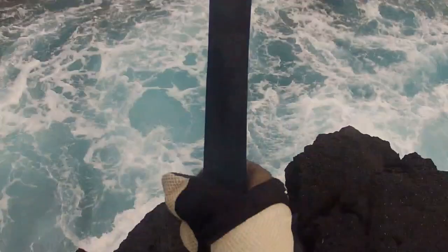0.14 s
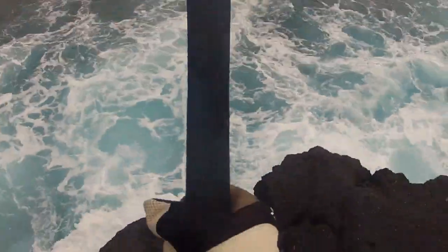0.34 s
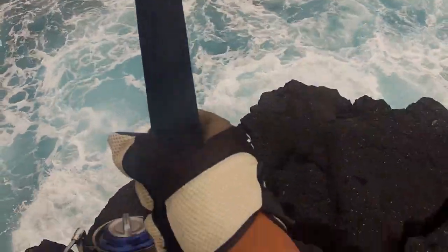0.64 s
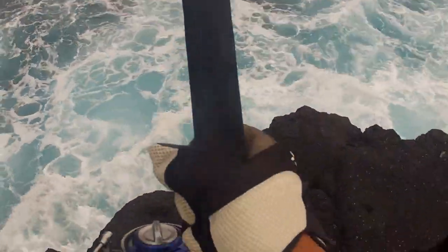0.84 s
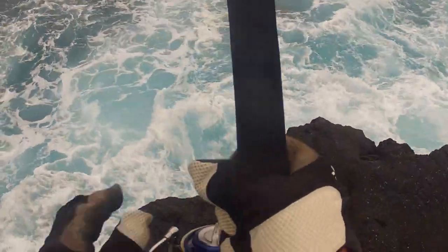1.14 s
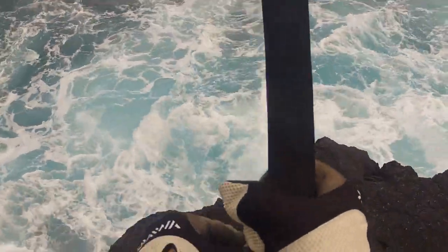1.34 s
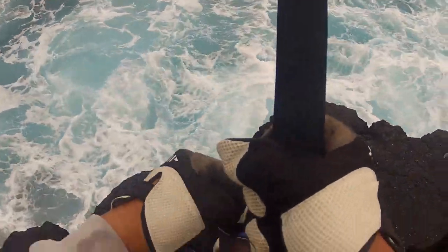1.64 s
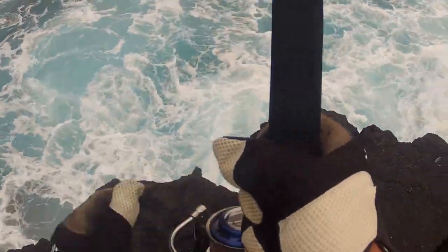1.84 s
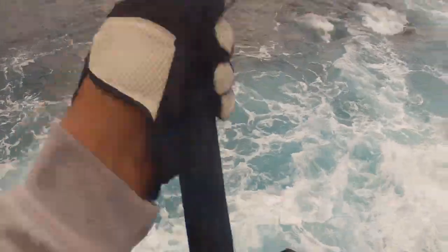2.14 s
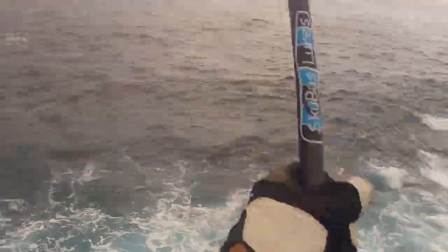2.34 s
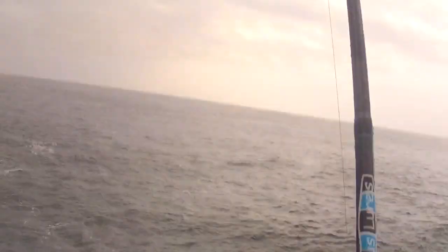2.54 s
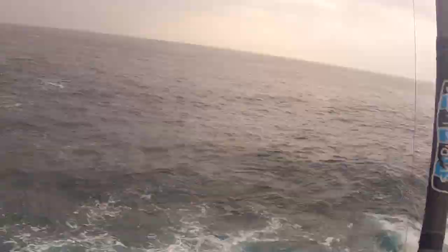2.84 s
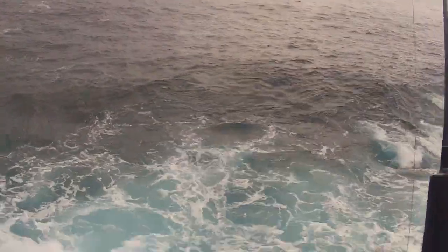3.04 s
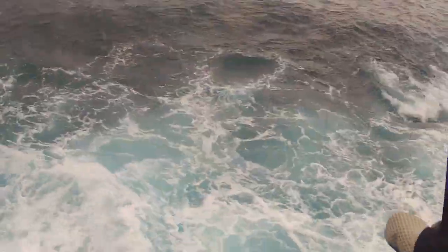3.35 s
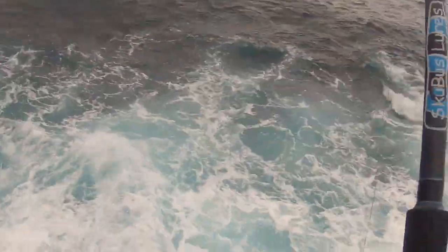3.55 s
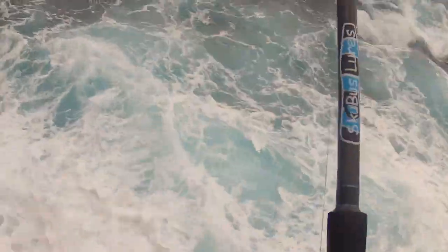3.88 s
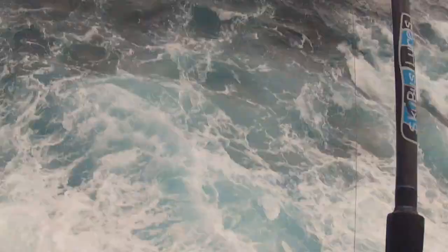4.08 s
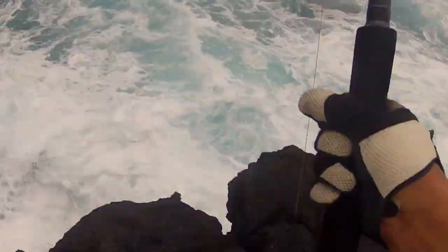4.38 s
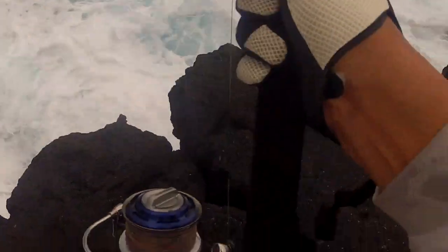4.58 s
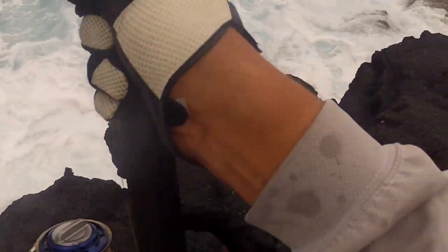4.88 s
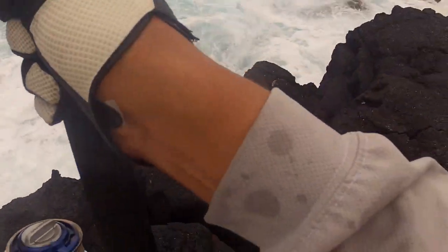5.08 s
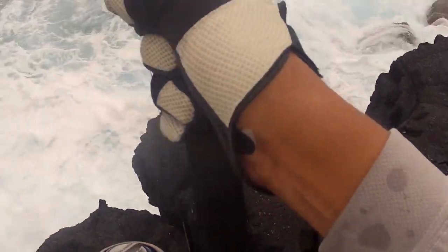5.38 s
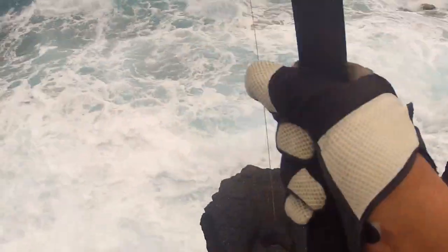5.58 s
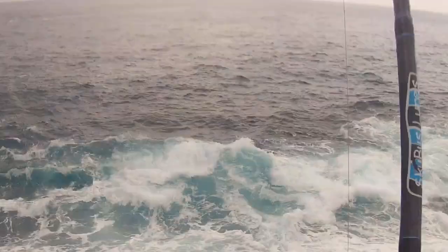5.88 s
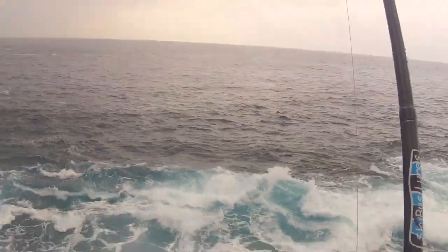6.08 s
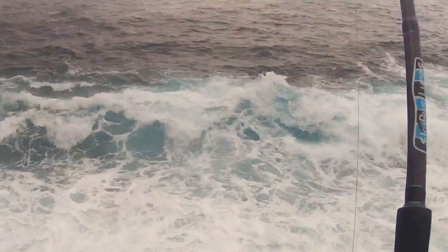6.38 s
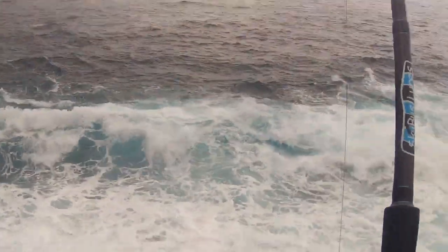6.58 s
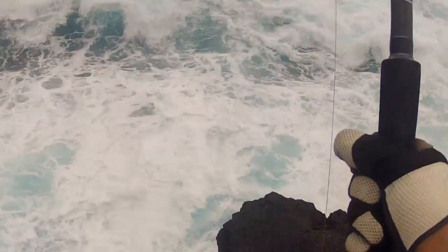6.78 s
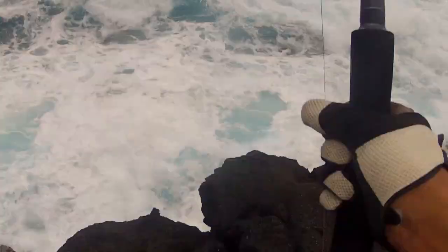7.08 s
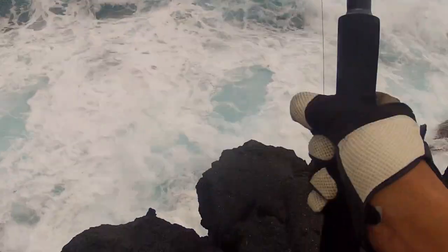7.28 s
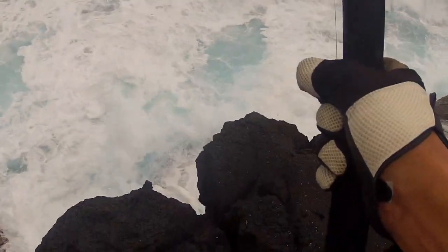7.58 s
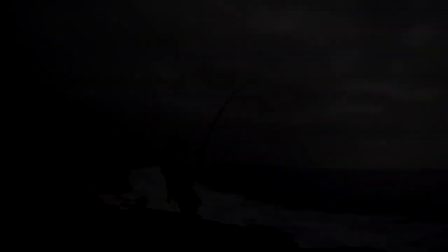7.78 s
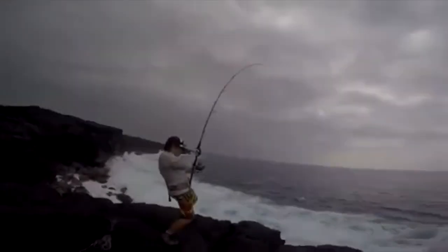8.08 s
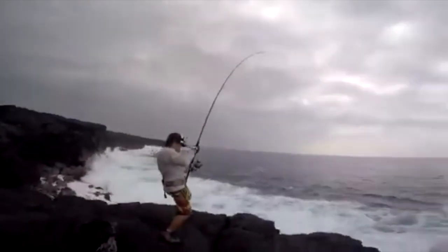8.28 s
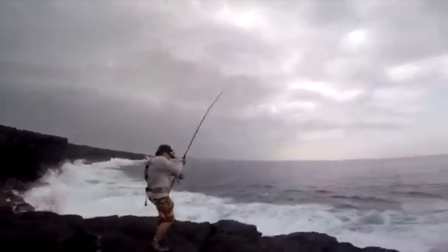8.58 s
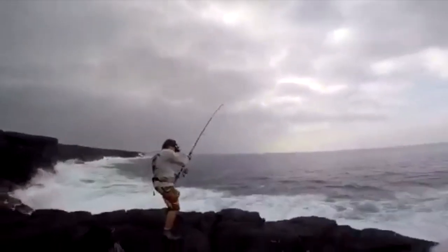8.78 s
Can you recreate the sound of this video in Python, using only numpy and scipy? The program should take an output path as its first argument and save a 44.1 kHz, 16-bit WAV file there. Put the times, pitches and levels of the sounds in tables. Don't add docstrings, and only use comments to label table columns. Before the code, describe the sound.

From 0 to 7.7 s, surf on rocks is heard through a sealed plastic housing: steady mid-range foam hiss over dull low rumble, swelling slightly toward the end, with a coarse lo-fi edge. A busy flurry of knocks, scuffs and a heavy low jolt fills the first half second, with thin metal tinks around 0.4 and 0.5 s. Sparse until 2.3 s, then irregular knocks and ticks gather from 3.1 to 4.4 s, including a strong scuff at 4.15 s. After a quieter gap, a hard clunk lands at 5.9 s, more clatter from 6.5 s and a bright metal ping at 7.05 s. Muffled wind thumps throughout. At 7.7 s it switches abruptly to an open microphone: brighter surf, sizzling spray and strong low wind buffeting. Dry taps fall at 8.1, 8.3, 8.6 and 8.8 s; low thumps accompany them, then a gritty scrape swells into a sharp snap at 8.92 s.

```python
import sys
import numpy as np
from scipy import signal
from scipy.fft import next_fast_len
from scipy.io import wavfile
from scipy.ndimage import uniform_filter1d

SR = 44100
rng = np.random.default_rng(int(sys.argv[2]) if len(sys.argv) > 2 else 0)


def store_pcm(level_fs):
    pcm = np.round(np.clip(level_fs, -1, 1) * 32767).astype(np.int16)
    wavfile.write(sys.argv[1], SR, np.atleast_2d(pcm).T)


def gain_from_decibels(decibels):
    exponent = np.asarray(decibels, float) / 20
    return 10 ** exponent


N = 393807
CHANGE_S = 7.697

# t/s, level/dB, weight of rumble and middle/dB
SURF_LEVEL = [(0.0, -45.5, -0.5), (0.28, -44.5, 3.5), (0.55, -46.5, -1.5), (1.18, -47.5, 0.5),
              (2.1, -47.5, 2.5), (3.3, -47, 3), (4.2, -46, 1.5), (5.1, -43, 0), (5.96, -43.5, 3),
              (6.9, -41, -1), (7.7, -41, 1.5)]
# f/Hz, density/dB per Hz
HISS_COLOUR = [(260, -28), (450, -6.5), (559, -9.5), (1030, -12.5), (1270, -4), (1560, -6.5), (1770, -1),
               (2040, -3.5), (2320, 1), (2480, -3.5), (2900, -4), (3200, -6), (3400, -10.5), (3630, -6),
               (3800, -12), (4080, -19), (4490, -13), (5230, -11.5), (5950, -23.5), (7740, -63),
               (13100, -120)]
# f/Hz, density/dB per Hz
RUMBLE_COLOUR = [(35, -31), (60, -2), (96, -2.5), (253, 1), (390, -3), (547, -18), (700, -37), (910, -21),
                 (1540, -120)]
RUMBLE_DB, RUMBLE_PER_WEIGHT = -6.5, 0.81

# t/s, level/dB, fizz against it/dB
SHORE_LEVEL = [
    (7.7, -42.5, -4.5),
    (7.846, -45, -1.5),
    (8.024, -44.5, 0.5),
    (8.24, -43.5, -1),
    (8.5, -44, -2),
    (8.88, -43.5, -5),
]
# f/Hz, density/dB per Hz
SHORE_COLOUR = [(70, -23), (120, -5.5), (500, -14), (1250, -16), (1450, -6), (1680, -14), (2000, -11.5),
                (3300, -13.5), (3600, -11.5), (4200, -14), (4800, -21), (8300, -28.5), (14800, -40),
                (15200, -70)]
# t/s, length/s, level/dB, first f/Hz, last f/Hz
SPRAY_SWELLS = [
    (7.71, .14, -48.5, 4000, 4240),
    (7.938, 0.25, -45, 4150, 3390),
    (8.211, 0.18, -44.5, 3900, 4040),
    (8.362, .12, -54, 3900, 3700),
    (8.491, 0.15, -47, 3650, 3550),
]

# t/s, peak/dB, brightness/dB, cavity/dB
KNOCKS = [(0.054, -20, -3.5, -25), (0.27, -15.5, -1, -25), (0.393, -23, -1, -24.5),
          (0.827, -23.5, 6, -30.5), (0.848, -23.5, -3, -27.5), (1.107, -29.5, -4, -37),
          (2.296, -25.5, -6, -31.5), (2.496, -23.5, 2, -27.5), (3.085, -23.5, -0.5, -32),
          (3.178, -24, -5, -30.5), (3.393, -21, 2, -29.5), (3.543, -23.5, -1, -25.5),
          (3.646, -21.5, 6, -28), (4.141, -24, 9, -45), (4.249, -32, 0, -29), (4.285, -25.5, 4, -32),
          (5.71, -24.5, -4, -29), (5.728, -22.5, -9, -25), (5.925, -12, -5, -16.5), (6.23, -24, -9, -26),
          (6.534, -25, -9, -42), (6.621, -25, 3, -36), (6.631, -17, -1, -20.5), (6.696, -27.5, -2, -26),
          (6.747, -20, 2, -25.5), (7.074, -21, 2, -29), (7.09, -18.5, 1, -21), (7.269, -25, -4, -31),
          (7.351, -32, -3, -26.5)]
# t/s, peak/dB, rattle/dB, cavity/dB, cavity f/Hz
SCUFFS = [(0.183, -25.5, -21.5, -19.5, 224), (0.261, -17, -33, -22.5, 243), (0.319, -27.5, -32, -21.5, 233),
          (0.38, -22.5, -30, -30, 254), (3.718, -31.5, -33.5, -24, 254), (4.153, -11.5, -25.5, -19.5, 257),
          (5.843, -33, -28, -27, 268), (5.868, -30, -28, -41, 265), (5.918, -17.5, -25, -26, 302),
          (6.581, -29, -34, -26, 275), (7.162, -30, -29, -22.5, 245), (7.281, -17.5, -30, -22, 262)]
# t/s, peak/dB, brightness/dB
TICKS = [(0.039, -31, -8), (0.112, -33, 5), (0.25, -42, -2), (0.458, -35, 8), (1.02, -40, -31),
         (2.6, -31, 2), (2.638, -34, 13), (3.296, -30.5, -3), (3.375, -30, -16), (3.523, -31.5, -14),
         (3.855, -28.5, 11), (3.901, -26.5, 19), (4.23, -29.5, 8), (4.433, -35, 3), (5.272, -31, 15),
         (5.993, -30, 4), (6.018, -36, -6), (6.04, -31, -9), (6.732, -28, -1), (6.788, -45, 4),
         (6.869, -29, 7), (6.9, -31, -4), (7.114, -28, 7), (7.403, -25, 5), (7.475, -28.5, -2),
         (7.61, -26.5, -1)]
# f/Hz, level/dB, t60/s
SHELL_MODES = [(792, 5.5, 0.014), (950, 11.5, 0.0097), (1120, 6.5, 0.014), (1418, 11.5, 0.012),
               (1760, 8, 0.011), (2087, 12, 0.011), (2470, 5, 0.0097), (2980, 1, 0.008), (3330, -9, 0.007)]
RATTLE_DB, RATTLE_PER_DB = -27, 0.3
SCUFF_BRIGHT_DB = -5
KNOCK_RATTLE_S, SCUFF_RATTLE_S, TICK_RATTLE_S = 0.021, 0.031, 0.025
REBOUND_S, REBOUND = 0.00322, 0.3
# t/s, peak/dB
BUMPS = [
    (3.145, -34),
    (3.232, -30.5),
    (3.616, -34),
    (3.87, -35),
    (7.398, -35),
]
CAVITY_HZ, CAVITY_T60_S = 268, 0.06
# t/s, length/s, level/dB
DRAGS = [(0.062, 0.031, -40.5), (0.108, 0.022, -44), (0.2, 0.032, -40), (0.278, 0.024, -46),
         (0.324, 0.023, -39.5), (0.4, 0.045, -47), (2.505, 0.024, -44), (2.626, 0.023, -45),
         (3.236, .04, -43), (4.163, .024, -42), (5.848, 0.034, -41.5), (5.935, .03, -42),
         (6.64, 0.028, -41), (6.582, .025, -44), (6.7, 0.018, -44), (7.108, .016, -41), (7.18, 0.03, -45)]
# lowest f/Hz, highest f/Hz
DRAG_BAND = (1700, 2350)

# t/s, peak/dB
TINKS = [
    (0.0443, -32),
    (0.3676, -22),
    (0.5137, -23),
    (0.6374, -33),
    (7.05, -18),
]
# t/s, peak/dB
BOUNCES = [
    (0.381, -28),
    (0.406, -31),
    (0.427, -32),
    (0.436, -37),
    (0.537, -35),
    (0.549, -36),
]
# f/Hz, level/dB, t60/s
METAL_MODES = [(2880, -5, .025), (3030, 0, 0.06), (3450, -7, .012), (4100, -9, .008), (4750, -1, 0.009),
               (5050, 1, 0.016), (5190, -5, 0.06), (5450, -2, 0.012)]

# t/s, peak/dB, body f/Hz, low/dB, high/dB
TAPS = [
    (8.101, -21, 865, -4, -7),
    (8.318, -23, 890, -11, -9),
    (8.559, -31, 630, -11, -20),
    (8.579, -21, 950, -14, 0),
    (8.827, -29, 805, -7, 0),
    (8.845, -34, 800, -2, -12),
]
# t/s, level/dB
SCRAPE_LEVEL = [
    (8.82, -53),
    (8.835, -43.5),
    (8.875, -48),
    (8.884, -40),
    (8.89, -32),
    (8.899, -26),
    (8.908, -29.5),
    (8.918, -24),
    (8.93, -24.5),
]
# f/Hz, density/dB per Hz
SCRAPE_COLOUR = [(100, -27), (200, -2), (400, -15), (600, -6), (1000, -1), (1700, -5), (2300, -15),
                 (2700, -3.5), (3200, -20), (3750, -4.5), (4400, -12), (4900, -21), (11900, -34),
                 (15000, -38), (15400, -76)]
SNAP_S, SNAP_DB = 8.9195, -11.5
# f/Hz, level/dB, t60/s
SNAP_MODES = [(1010, -5, .012), (1500, -10, .01), (2730, 2, .03), (3900, -19, .015), (4420, 2, 0.023)]

# t/s, peak/dB, f/Hz, t60/s
JOLTS = [
    (0.107, -7, 32, 0.089),
    (0.141, -12.5, 20, 0.089),
    (6.574, -14, 25.5, 0.26),
    (8.315, -14.5, 135, 0.023),
    (8.56, -15, 47, 0.14),
    (8.835, -11, 69, 0.047),
    (8.887, -9.5, 79, 0.041),
]

# t/s, peak/dB, length/s
GUSTS_WORN = [(0.0, -30, .09), (0.13, -25, 0.035), (0.235, -23, .12), (0.36, -26.5, 0.14),
              (0.8, -31.5, 0.07), (1.09, -39, 0.44), (1.31, -35, 0.13), (1.97, -34.5, 0.36),
              (2.235, -28, 0.095), (2.34, -32, .12), (2.46, -34, 0.15), (3.09, -30.5, 0.19),
              (3.17, -29, 0.082), (3.27, -30.5, 0.22), (3.38, -30.5, 0.12), (3.64, -30.5, 0.21),
              (3.86, -30, 0.29), (4.16, -35.5, 0.57), (4.27, -32.5, 0.12), (4.42, -38.5, .3),
              (4.57, -34, 0.37), (5.25, -30, .15), (5.68, -35.5, .11), (5.9, -21, 0.11),
              (6.22, -32.5, 0.15), (6.62, -23, 0.073), (6.95, -37.5, 0.69), (7.25, -37, .3),
              (7.46, -36, 0.38), (7.57, -39, .2)]
# t/s, level/dB
LULL_WORN = [(0.0, -40), (0.6, -45), (0.75, -50), (1.4, -41.5), (1.8, -47.5), (2.7, -42), (5.04, -45),
             (5.11, -38), (5.31, -39), (5.36, -47), (5.55, -51), (5.76, -49), (6.05, -35), (6.38, -48),
             (6.5, -36.5), (7.7, -42.5)]
# f/Hz, density/dB per Hz
SEALED_WIND = [(7.1, -38), (12, 11), (22, 3), (34, -2.5), (50, -6), (70, -19), (110, -25), (140, -51),
               (240, -120)]
# t/s, peak/dB, length/s
GUSTS_OPEN = [(7.74, -20, .12), (7.852, -13.5, 0.14), (7.972, -18, 0.22), (8.058, -17, .1),
              (8.126, -11.5, 0.082), (8.25, -15.5, 0.11), (8.332, -14.5, 0.28), (8.602, -17, 0.16),
              (8.7, -12, 0.072), (8.8, -16.5, 0.59), (8.93, -18, .4)]
# t/s, level/dB
LULL_OPEN = [
    (7.7, -24.5),
    (8.93, -28.5),
]
# f/Hz, density/dB per Hz
OPEN_WIND = [(5, -10), (14, -9), (24, 7.5), (40, -0.5), (56, -10.5), (103, -27), (220, -42.5), (300, -74)]
GUST_DROP_DB, GUST_RISE = 13.5, 0.46


def surf():
    weight_db = curve(SURF_LEVEL, column=2)
    hiss = noise(HISS_COLOUR, size=1024, patchy_db=0.73, flicker_db=0.32, ref_hz=(1200, 3500))
    hiss = hiss + (gain_from_decibels(weight_db) - 1) * band(hiss, 730, 1400)
    rumble = noise(RUMBLE_COLOUR, size=2048, patchy_db=1.0, flicker_db=-0.96, ref_hz=(120, 450))
    rumble_gain = gain_from_decibels(RUMBLE_DB + RUMBLE_PER_WEIGHT * weight_db)
    return gain_from_decibels(curve(SURF_LEVEL)) * (hiss + rumble_gain * rumble)


def shore():
    wash = noise(SHORE_COLOUR, size=1024, patchy_db=1.5, flicker_db=0.67, ref_hz=(600, 3000))
    fizz_gain = gain_from_decibels(curve(SHORE_LEVEL, column=2) + 2.5)
    wash = wash + (fizz_gain - 1) * band(wash, 3500, 5900)
    return gain_from_decibels(curve(SHORE_LEVEL)) * wash


def spray():
    out = np.zeros(N)
    draws = rng.standard_normal((len(SPRAY_SWELLS), 2, 13000))
    lowpass = signal.butter(2, 180, fs=SR, output="sos")
    for (s, length, db, first_hz, last_hz), (a, b) in zip(SPRAY_SWELLS, draws):
        u = np.arange(round(length * SR)) / (length * SR)
        slow = signal.sosfilt(lowpass, a + 1j * b)[-len(u):]
        turns = np.cumsum(first_hz + (last_hz - first_hz) * u) / SR
        sizzle = evened((slow * np.exp(2j * np.pi * turns)).real)
        add(out, s, gain_from_decibels(db) * np.sqrt(np.sin(np.pi * u)) * sizzle)
    return out


def blows_on_shell():
    firm = [(s, db, bright, RATTLE_DB + RATTLE_PER_DB * db, KNOCK_RATTLE_S) for s, db, bright, _ in KNOCKS]
    light = [(s, db, bright, RATTLE_DB + RATTLE_PER_DB * db, TICK_RATTLE_S) for s, db, bright in TICKS]
    dragged = [(s, db, SCUFF_BRIGHT_DB, tail, SCUFF_RATTLE_S) for s, db, tail, _, _ in SCUFFS]
    return sorted(firm + light + dragged)


def knocks():
    blows, rattle = np.zeros(N), np.zeros(N)
    t = np.arange(3500) / SR
    rows = blows_on_shell()
    draws = rng.standard_normal((len(rows), 3500 + len(SHELL_MODES)))
    for (s, db, bright_db, tail_db, tail_s), chance in zip(rows, draws):
        grit, spread = chance[:3500], chance[3500:]
        modes = []
        for (hz, mode_db, t60), u in zip(SHELL_MODES, spread):
            tilt_db = bright_db * np.log2(min(hz, 2000) / 1400)
            modes.append((hz * (1 + 0.022 * u), mode_db + tilt_db, t60))
        strike = contacts(grit, build_s=0.0017, loose=0.025)
        sound = signal.fftconvolve(strike, ring(modes, length=1200))
        delay = round(REBOUND_S * SR * (1 + 0.15 * grit[0]))
        sound = sound + REBOUND * np.roll(sound, delay)
        sound = band(sound, 742, 4700)
        add(blows, s, gain_from_decibels(db) * sound / abs(sound).max())
        swell = (1 - np.exp(-t / 0.0054)) * np.exp(-(t / tail_s) ** 2)
        add(rattle, s, gain_from_decibels(tail_db) * grit[::-1] * swell)
    return blows + 1.76 * band(rattle, 1840, 2170) + band(rattle, 710, 2000)


def bumps():
    out, push = np.zeros(N), np.hanning(60)
    rows = [(s, db, CAVITY_HZ) for s, *_, db in KNOCKS + BUMPS]
    rows += [(s, db, hz) for s, _, _, db, hz in SCUFFS]
    for s, db, hz in rows:
        modes = [(hz, 0, CAVITY_T60_S), (1.13 * hz, -9, 0.27 * CAVITY_T60_S), (0.77 * hz, -9, 0.5 * CAVITY_T60_S)]
        sound = np.convolve(push, ring(modes, length=5000))
        add(out, s + 0.0014, -gain_from_decibels(db) * sound / abs(sound).max())
    return out


def drags():
    out = np.zeros(N)
    for (s, length, db), grit in zip(DRAGS, rng.standard_normal((len(DRAGS), 3000))):
        u = np.linspace(0, 1, round(length * SR))
        rough = evened(band(grit * abs(grit), *DRAG_BAND))[:len(u)]
        add(out, s, gain_from_decibels(db) * np.sqrt(np.sin(np.pi * u) + 1e-9) * rough)
    return out


def tinks(rows):
    out = np.zeros(N)
    for (s, db), grit in zip(rows, rng.standard_normal((len(rows), 800))):
        strike = contacts(grit, build_s=0.00107, loose=0.018)
        sound = np.convolve(strike, ring(METAL_MODES, length=3000))
        add(out, s, gain_from_decibels(db - 6.0) * sound / abs(sound).max())
    return out


def taps():
    out, push = np.zeros(N), np.hanning(9)
    for s, db, hz, low_db, high_db in TAPS:
        modes = [(250, low_db, 0.025), (0.55 * hz, low_db, 0.018), (0.79 * hz, -2, 0.012), (hz, 0, 0.015),
                 (1.46 * hz, -11, 0.007), (2000, high_db, 0.013), (3700, -13, 0.008)]
        sound = np.convolve(push, ring(modes, length=1500))
        add(out, s, gain_from_decibels(db) * sound / abs(sound).max())
    return out


def scrape():
    grit = noise(SCRAPE_COLOUR, size=512, patchy_db=1.5, flicker_db=2.5, ref_hz=(300, 6000))
    started = np.arange(N) > SCRAPE_LEVEL[0][0] * SR
    out = gain_from_decibels(curve(SCRAPE_LEVEL)) * grit * started
    snap = np.convolve(np.hanning(9), ring(SNAP_MODES, length=1500))
    add(out, SNAP_S, gain_from_decibels(SNAP_DB) * snap / abs(snap).max())
    return out


def jolts():
    out, t = np.zeros(N), np.arange(9000) / SR
    for s, db, hz, t60 in JOLTS:
        turns = hz * (t + 0.0076 * (1 - np.exp(-t / 0.01)))
        fade = gain_from_decibels(db - 60 * (t / t60) ** 1.47)
        add(out, s, -fade * np.sin(2 * np.pi * turns) * np.minimum(t / 0.011, 1))
    return out


def calm():
    t = np.arange(N) / SR
    dips = [1 - 0.85 * np.exp(-((t - s - 0.03) / 0.045) ** 4) for s, _, hz, _ in JOLTS if hz < 40]
    return np.prod(dips, axis=0)


def gusts(rows, lull):
    t, level_db = np.arange(N) / SR, curve(lull)
    for s, db, length in rows:
        away = np.maximum((s - t) / GUST_RISE, (t - s) / (1 - GUST_RISE)) / length
        level_db = np.maximum(level_db, db - GUST_DROP_DB * away)
    return level_db


def wind(level_db, colour, steadiness):
    x = noise(colour, size=8192, patchy_db=0.0, flicker_db=-1.0, ref_hz=(12, 70))
    envelope = abs(signal.hilbert(x, next_fast_len(N))[:N])
    swing = uniform_filter1d(envelope, size=900)
    return gain_from_decibels(level_db) * evened(x / (swing + 0.057) ** np.clip(steadiness, 0, 1))


def held(x):
    steps = np.repeat(signal.resample_poly(x, 40, 147), 4)
    return edge(np.resize(signal.resample_poly(steps, 147, 160), N), 15300)


def edge(x, hz):
    return signal.oaconvolve(x, signal.firwin(511, hz, window=("kaiser", 8), fs=SR), "same")


def contacts(grit, build_s, loose):
    t = np.arange(len(grit)) / SR / build_s
    firm = np.arange(len(grit)) == round(1.5 * build_s * SR)
    return loose * grit * abs(grit) * t * np.exp(1 - t) - firm


def ring(modes, length):
    t = np.arange(length) / SR
    out = np.zeros(length)
    for k, (hz, db, t60) in enumerate(modes):
        out += (-1) ** k * gain_from_decibels(db - 60 * t / t60) * np.sin(2 * np.pi * hz * t)
    return out


def noise(colour, size, patchy_db, flicker_db, ref_hz):
    frames, hz = 4 * N // size + 5, np.fft.rfftfreq(size, 1 / SR)
    a, b, patches = rng.standard_normal((frames, len(hz), 3)).T
    patches = uniform_filter1d(patches, size=8, axis=0)
    patches = evened(uniform_filter1d(patches, size=9, axis=1))
    flicker = evened(uniform_filter1d(rng.standard_normal(frames), size=3))
    level_db = read(colour, hz)[:, None] + patchy_db * patches + flicker_db * flicker
    z = (a + 1j * b) * gain_from_decibels(level_db)
    x = signal.istft(z, nperseg=size, noverlap=3 * size // 4)[1][:N]
    return x / np.std(band(x, *ref_hz))


def band(x, lo_hz, hi_hz):
    return signal.sosfiltfilt(signal.butter(2, [lo_hz, hi_hz], "band", fs=SR, output="sos"), x)


def evened(x):
    return x / np.sqrt(np.mean(x ** 2) + 1e-20)


def read(points, hz):
    f, value = np.transpose(points)
    return np.interp(np.log(hz + 1), np.log(f + 1), value)


def curve(rows, column=1):
    rows = np.array(rows)
    return np.interp(np.arange(N) / SR, rows[:, 0], rows[:, column])


def add(mix, s, sound):
    part = mix[round(s * SR):][:len(sound)]
    part += sound[:len(part)]


def scene():
    shaken = jolts()
    worn = surf() + knocks() + bumps() + drags() + tinks(TINKS) + tinks(BOUNCES) + shaken
    worn += calm() * wind(gusts(GUSTS_WORN, LULL_WORN), SEALED_WIND, steadiness=0.4)
    worn = held(worn)
    opened = shore() + spray() + taps() + scrape() + shaken
    opened += wind(gusts(GUSTS_OPEN, LULL_OPEN), OPEN_WIND, steadiness=0.34)
    opened = edge(opened, 15000)
    since = (np.arange(N) / SR - CHANGE_S) / 0.0069
    mix = worn * np.clip(-since, 0, 1) + opened * np.clip(since, 0, 1)
    return mix[None]


def low_pass(x):
    return signal.sosfilt(signal.butter(12, 15840, fs=SR, output="sos"), x)


def record(dry):
    return low_pass(dry)


dry = scene()
out = record(dry)
store_pcm(out)
```